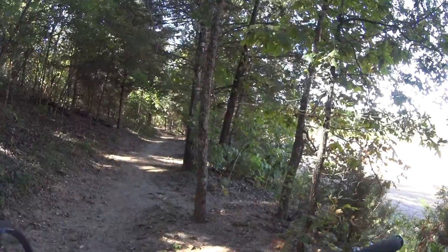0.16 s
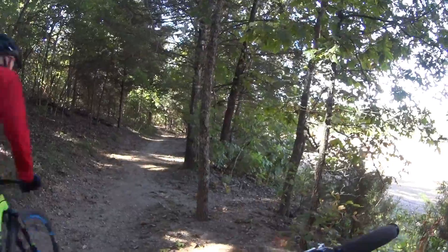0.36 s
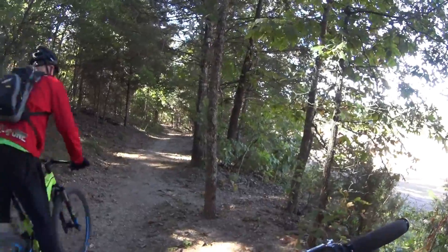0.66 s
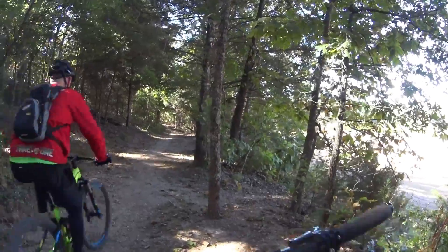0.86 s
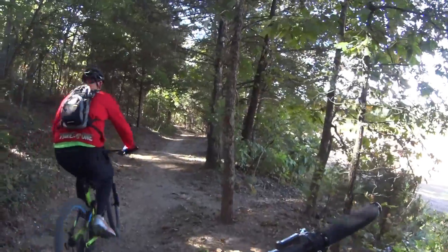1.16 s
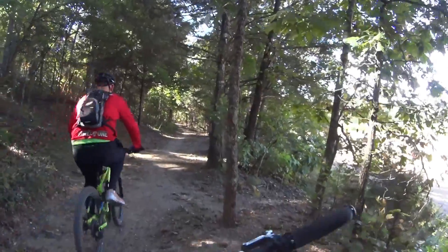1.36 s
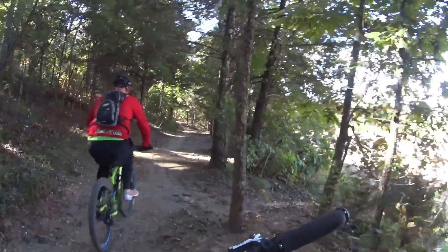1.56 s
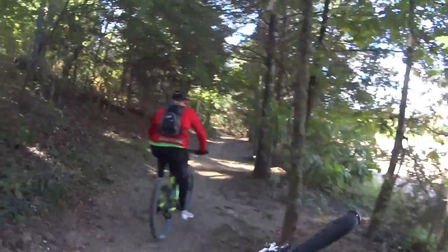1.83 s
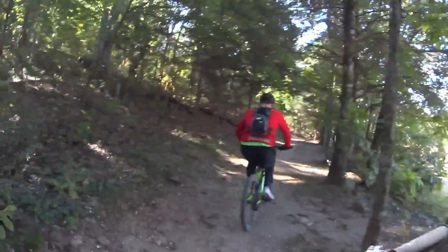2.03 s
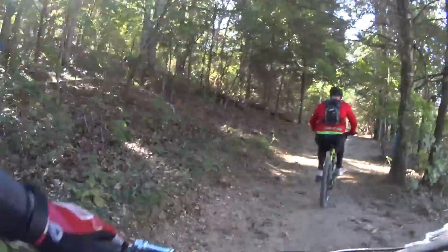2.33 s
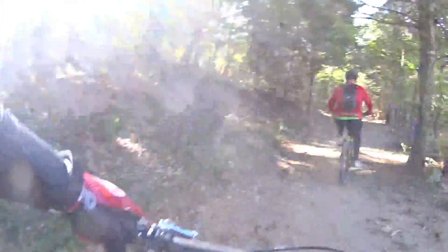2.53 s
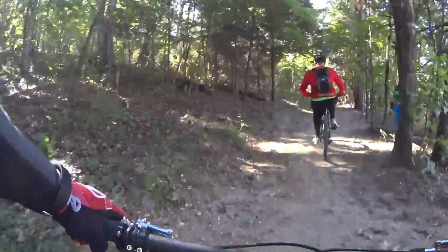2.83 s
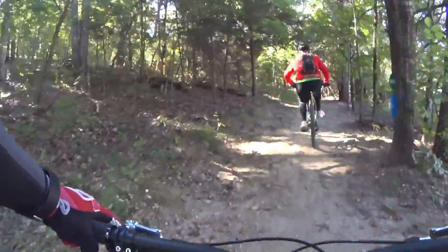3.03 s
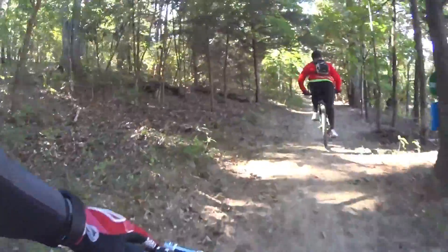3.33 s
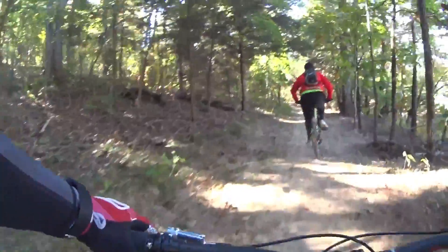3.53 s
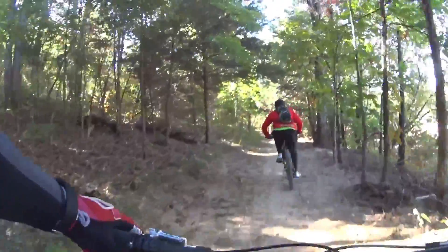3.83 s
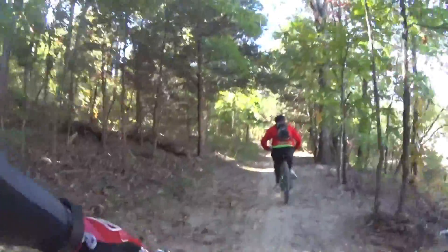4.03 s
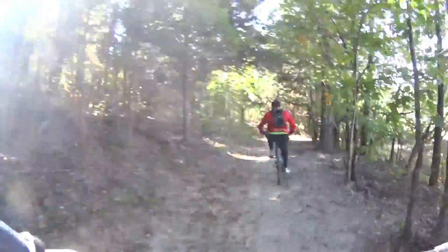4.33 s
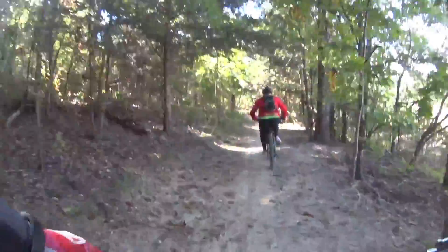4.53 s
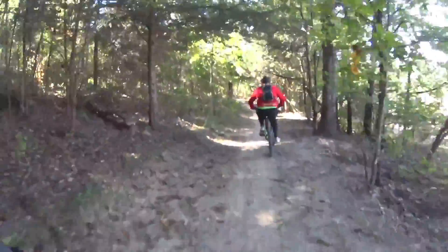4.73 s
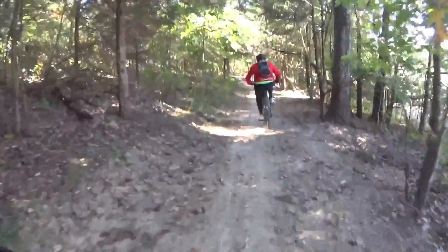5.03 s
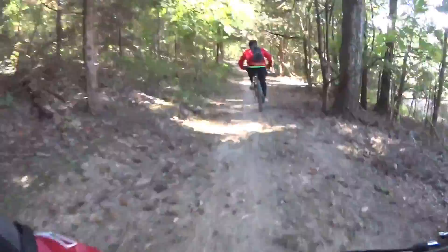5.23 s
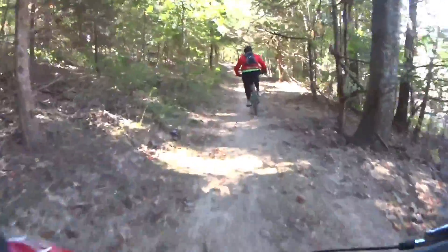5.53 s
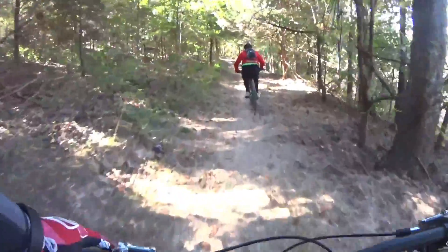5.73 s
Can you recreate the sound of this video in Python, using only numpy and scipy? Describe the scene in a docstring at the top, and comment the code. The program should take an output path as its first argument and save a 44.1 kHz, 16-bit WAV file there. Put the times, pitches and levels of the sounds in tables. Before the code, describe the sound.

Heard close from the rider's chest in open air, a bicycle starts rolling with quick, bright metallic freewheel ticks. These give way to tyres crunching in waves through dirt and dry leaves on a forest path, getting louder as the bike speeds up. Irregular clacks, light chain and cable rattles, soft thumps and a few tiny steel pings come from the shaking bike.

```python
"""Mountain bike on a dry woodland trail

A bike sets off behind another, heard from the rider's chest. The freewheel ticks and whirrs at first;
then the tyres scrub in surges over grit and dead leaves, hissing more as the speed grows.
Stones and loose parts knock on the bike, and bumps thud through the frame."""
import sys
import numpy as np
from scipy import signal
from scipy.fft import rfft, irfft
from scipy.io import wavfile
from scipy.ndimage import uniform_filter1d, minimum_filter1d

SR = 44100
rng = np.random.default_rng(int(sys.argv[2]) if len(sys.argv) > 2 else 0)


def wav_record(signal):
    """Record a signal, one row per channel, as 16-bit PCM in the file named by sys.argv[1]."""
    frames = np.transpose(np.atleast_2d(signal))
    bounded = np.clip(frames, -1, 1)
    # unit amplitude maps onto the largest positive 16-bit level
    quanta = np.round(bounded * 32767).astype(np.int16)
    wavfile.write(sys.argv[1], SR, quanta)


N = 259114
TIME = np.arange(N) / SR


def from_db(db):
    """Decibels to gain."""
    return 10 ** (np.asarray(db) / 20)


def rms_one(x):
    """Scale to unit rms."""
    return x / np.sqrt(np.mean(x ** 2) + 1e-20)


def each_rms_one(blows):
    """Give every row the same energy."""
    return blows / np.std(blows, axis=1, keepdims=True)


def coloured(x, spectrum, size=4096):
    """Minimum-phase EQ on each row, so nothing rings ahead of an attack."""
    hz, db = np.transpose(spectrum)
    grid_hz = np.maximum(np.fft.rfftfreq(size, 1 / SR), 1)
    gain = from_db(np.interp(np.log(grid_hz), np.log(hz), db))
    cepstrum = irfft(np.log(gain))
    causal_fold = 1 + np.sign(size // 2 - np.arange(size)) - (np.arange(size) == 0)
    response = irfft(np.exp(rfft(cepstrum * causal_fold)))
    return signal.fftconvolve(x, response[None], axes=-1)[:, :x.shape[-1]]


def resonate(x, modes):
    """Parallel resonators of alternating polarity."""
    out = 0
    for k, (hz, width_hz, db) in enumerate(modes):
        r = np.exp(-np.pi * width_hz / SR)
        poles = [1, -2 * r * np.cos(2 * np.pi * hz / SR), r * r]
        out = out + (-1) ** k * from_db(db) * (1 - r * r) / 2 * signal.lfilter([1, 0, -1], poles, x)
    return out


def band_pass(blows, centre_hz, width_octaves):
    """Focus each row around its own pitch."""
    return np.array([signal.lfilter(*signal.iirpeak(hz, 1.4 / width_octaves, fs=SR), blow)
                     for blow, hz in zip(blows, centre_hz)])


def stereo(pair, side_db, pan_db):
    """Mid and side to left and right; positive pan leans left."""
    sides = np.array([[1], [-1]])
    return (pair[0] + from_db(side_db) * sides * pair[1]) * from_db(sides * pan_db / 2)


def crushes(per_s, t60, spread_db):
    """Power envelope of mean 1: things give way one by one, each starting at once and dying away."""
    sizes = from_db(spread_db * np.clip(rng.standard_normal(N), -2, 2)) ** 2
    onsets = sizes * (rng.random(N) < per_s / SR)
    decay = from_db(-120 / (t60 * SR))
    power = signal.lfilter([1], [1, -decay], onsets + 1e-18)
    return power / power.mean()


def fractures(per_s, spread_db, bed_db, power):
    """Two trains of tiny uneven breaks over a noise bed of finer ones, following a power envelope."""
    sizes = from_db(spread_db * np.minimum(rng.exponential(1, (2, N)), 2.3))
    polarity = rng.choice([-1, 1], (2, N))
    breaks = rms_one(sizes * polarity * (rng.random((2, N)) < per_s / SR))
    return np.sqrt(power) * (breaks + from_db(bed_db) * rng.standard_normal((2, N)))


def taps(per_s):
    """Light contacts at random moments, of uneven strength."""
    return (rng.random(N) < per_s / SR) * rng.uniform(0.58, 1, N) * rng.choice([-1, 1], N)


def contacts(count, t60, tail_db, tail_t60, size=2048):
    """One row per blow: a dying burst of micro-contacts with a faint longer tail."""
    age = np.arange(size) / SR
    envelope = from_db(-60 * age / t60) + from_db(tail_db - 60 * age / tail_t60)
    return rng.standard_normal((count, size)) * envelope


def placed(blows, start_s, peak_db):
    """Lay each row on the timeline at its moment and peak level."""
    out = np.zeros(N + blows.shape[1])
    for blow, s, db in zip(blows, start_s, peak_db):
        at = int(np.clip(s * SR, 0, N))
        out[at:at + len(blow)] += from_db(db) * blow / np.abs(blow).max()
    return out[:N]


def riding():
    """Three control curves in dB: speed, the tyres' surging bite, and high hiss."""
    # rolling speed, as loudness: time_s, level_db
    speed = [(0, -10.5), (.55, -10.5), (1.15, -5), (1.4, -7), (2.2, -3.5), (2.3, -4), (2.45, -4),
             (2.9, -3.5), (3.02, -2), (3.25, -1), (3.8, 0), (4.12, -2), (4.7, 1.5), (5.5, 1), (5.88, 3)]
    # high hiss level, the hub's whirr at first, then dry leaves: time_s, level_db
    high_hiss = [(0, 0), (.3, 6.5), (.95, 3.5), (1.15, 1), (1.6, 3.5), (2.3, 0.5), (2.55, 0), (3.0, 0),
                 (3.3, 3.5), (3.5, -1), (4.05, 3.5), (4.5, 2), (5.0, 6.5), (5.88, 6.5)]
    # the tyres bite into the dirt: peak_s, gain_db, swell_s, release_s
    surges = [(.19, 6.5, 0.056, 0.062), (.43, 4.5, 0.024, 0.022), (.73, 5.5, 0.063, .07),
              (.84, 7.5, .08, 0.052), (1.13, 2, 0.059, 0.11), (1.3, 8.5, .08, .07),
              (1.41, 10.5, 0.12, 0.12), (1.54, 9, 0.1, 0.072), (1.65, 8.5, 0.036, 0.033),
              (1.78, 10.5, 0.053, 0.18), (1.86, 4.5, 0.067, 0.065), (2.02, 9.5, .09, 0.16),
              (2.17, 9.5, 0.045, 0.082), (2.42, 3.5, .08, 0.09), (2.52, 6, 0.07, 0.066),
              (2.64, 5.5, 0.086, 0.11), (2.87, 7.5, 0.073, 0.052), (2.95, 7.5, 0.024, .03),
              (3.26, 8, 0.15, 0.08), (3.45, 3.5, 0.021, 0.049), (3.6, 7, 0.063, 0.1),
              (3.97, 3, 0.085, 0.15), (4.26, 4.5, 0.037, 0.031), (4.4, 4.5, .05, 0.1),
              (4.56, 7.5, 0.031, 0.035), (4.68, 5, .07, 0.045), (5.2, 2, 0.045, 0.19),
              (5.72, 2, 0.11, 0.025)]
    surge_db = np.zeros(N)
    for peak_s, gain_db, swell_s, release_s in surges:
        from_peak = np.maximum((peak_s - TIME) / swell_s, (TIME - peak_s) / release_s)
        surge_db = np.maximum(surge_db, gain_db * (1 - from_peak ** 2))  # a rounded arch
    speed_db = np.interp(TIME, *np.transpose(speed))
    hiss_db = np.interp(TIME, *np.transpose(high_hiss))
    return np.array([speed_db, surge_db, hiss_db])


def level_of(law, ride):
    """A rolling layer's level in dB: a base plus its own share of each control curve."""
    return law[0] + np.dot(law[1:], ride)


def tyres(ride):
    """Tread scrubs and grit crunches under a crackling hiss: the hub's whirr at first, then dry leaves."""
    # how each layer follows the ride: base_db, speed_share, surge_share, hiss_share
    scrub_law = (-39, 0.91, 1.25, -0.16)
    grit_law = (-40.5, 1.46, 0.86, -0.03)
    hiss_law = (-37.5, 1.29, 0.4633, 0.8751)
    spray_law = (-50.5, 1.0, 0.4, 2.0647)
    # resonances of tread and grit: pitch_hz, width_hz, gain_db
    tread_modes = [(1840, 320, -7), (2299, 153, -1), (2550, 200, -2.5)]
    grit_modes = [(778, 33, -7.5), (1083, 150, -4.5), (1320, 136, 1), (1734, 305, -2.5),
                  (2700, 1850, -15.5)]
    # tone of tread, grit, hiss and the fine spray above it: frequency_hz, gain_db
    tread_eq = [(500, -7), (1400, -3), (2500, 3), (3000, -1), (4000, -28), (9000, -23)]
    grit_eq = [(200, -18), (700, 2), (1000, 8.5), (2000, 0), (3200, 9.5), (7000, -13.5)]
    hiss_eq = [(900, -20.5), (2000, -12), (2800, 5.5), (3300, 3.5), (4000, 2), (4800, 3), (5400, 1.5),
               (5800, 4.5), (6400, -4), (7200, -15), (11000, -35.5)]
    spray_eq = [(4000, -9), (6400, 8), (7400, 3), (8100, 8.5), (8700, 5.5), (9100, 4.5), (9700, 4),
                (11000, -3)]
    pebbles = crushes(per_s=120, t60=0.056, spread_db=-1)
    crumples = crushes(per_s=130, t60=0.055, spread_db=4.5)
    slips = fractures(per_s=2500, spread_db=2, bed_db=-4, power=1 + from_db(-4.5) * pebbles)
    stones = fractures(per_s=900, spread_db=1.5, bed_db=4, power=1 + from_db(-1.5) * pebbles)
    # the louder the crackle, the more it merges into an even hiss
    hiss_db = level_of(hiss_law, ride)
    clumps = from_db(-0.6 * (hiss_db - hiss_db.mean())) * crumples
    snaps = fractures(per_s=1600, spread_db=10.5, bed_db=2.5, power=1 + clumps)
    fine_snaps = fractures(per_s=1400, spread_db=9.5, bed_db=1, power=1 + from_db(-10) * clumps)
    scrub = from_db(level_of(scrub_law, ride)) * rms_one(coloured(resonate(slips, tread_modes), tread_eq))
    grit = from_db(level_of(grit_law, ride)) * rms_one(coloured(resonate(stones, grit_modes), grit_eq))
    hiss = from_db(hiss_db) * rms_one(coloured(snaps, hiss_eq))
    spray = from_db(level_of(spray_law, ride)) * rms_one(coloured(fine_snaps, spray_eq))
    return (stereo(scrub, side_db=-9.5, pan_db=-6.5) + stereo(grit, side_db=-14.5, pan_db=-0.5)
            + stereo(hiss, side_db=-9, pan_db=-3) + stereo(spray, side_db=-5, pan_db=-0.5))


def frame_rumble(ride):
    """Rough ground shakes the bike, which hums in its low resonances over the dull roll of the earth."""
    # how each layer follows the ride: base_db, speed_share, surge_share, hiss_share
    rumble_law = (-53.5, 1.07, 0.47, -0.67)
    hum_law = (-53.5, 2, -0.07, 0.4)
    earth_law = (-49, 1.0, 0.6541, -0.13)
    # tone of the deep shake and of the earth under the wheels: frequency_hz, gain_db
    rumble_eq = [(20, -0.5), (35, -3), (60, -2), (100, 0.5), (155, -3), (220, 2), (330, -9), (600, -35.5)]
    earth_eq = [(200, -17), (330, -7), (420, -1), (490, -3.5), (541, 1), (600, -2.5), (720, -3),
                (1000, -1.5), (2000, -35.5)]
    # the bike's low resonances: pitch_hz, width_hz, gain_db
    hum_modes = [(133, 46, -10.5), (274.6, 54, 5)]
    shaking = rng.standard_normal((3, 2, N))
    shaking *= np.sqrt(1 + from_db(2.5) * crushes(per_s=36, t60=0.23, spread_db=0))
    rumble = from_db(level_of(rumble_law, ride)) * rms_one(coloured(shaking[0], rumble_eq))
    hum = from_db(level_of(hum_law, ride)) * rms_one(resonate(shaking[1], hum_modes))
    earth = from_db(level_of(earth_law, ride)) * rms_one(coloured(shaking[2], earth_eq))
    return (stereo(rumble, side_db=-12, pan_db=-1) + stereo(hum, side_db=-23, pan_db=1.5)
            + stereo(earth, side_db=-5, pan_db=-0.5))


def rattles(speed_db):
    """Cables and chain tap lightly at random, more often and harder as the speed grows."""
    # one ring per loose part: pitch_hz, width_hz, gain_db
    part_modes = [(1210, 56, 0.5), (1310, 68, 3), (1385, 86, 4), (1755, 66, 2.5)]
    shaking = from_db(1.3 * (speed_db - speed_db.max()))
    touches = shaking * taps(per_s=45 * shaking)
    part = rng.integers(0, len(part_modes), N)
    rings = sum(resonate(touches * (part == k), [mode]) for k, mode in enumerate(part_modes))
    return from_db(-44) * rms_one(rings)


def stone_flicks(speed_db, surge_db):
    """The tread flicks small stones against the bike, most of all while it bites."""
    # rings that each stone excites in a different mix: pitch_hz, width_hz, gain_db
    flick_modes = [(1260, 130, 4.5), (2300, 130, 14.5), (2680, 220, 15.5), (4240, 230, -3),
                   (5800, 600, -18.5)]
    force = from_db(0.62 * speed_db + 0.4 * surge_db)
    hits = force * taps(per_s=16 * force)
    pair = [rms_one(sum(resonate(hits * rng.uniform(0, 1, N), [mode]) for mode in flick_modes))
            for _ in range(2)]
    return from_db(-48) * stereo(pair, side_db=-6, pan_db=-1)


def freewheel():
    """Pawls drop into the ratchet: short, bright, metallic ticks."""
    # pawl ticks: start_s, level_db
    ticks = [(0.181, -23.5), (0.207, -32), (0.2452, -21.5), (0.2837, -19.5), (0.325, -23), (0.377, -23),
             (0.4163, -20), (0.4509, -24.5), (0.488, -21.5), (0.5382, -24), (0.5818, -25), (0.6162, -24),
             (0.6475, -20.5), (0.7035, -23.5), (0.7492, -23), (0.788, -24.5), (0.839, -18), (0.9344, -21.5),
             (0.9854, -23)]
    # tone of a tick: frequency_hz, gain_db
    pawl_eq = [(500, -19), (1600, -19), (2500, 2.5), (3600, -3.5), (4600, -5), (5900, 1), (7400, -7),
               (8300, -9), (8750, -6), (9100, -10.5), (11000, -13.5)]
    start_s, level_db = np.transpose(ticks)
    snaps = [contacts(len(ticks), t60=0.05, tail_db=-16, tail_t60=0.12, size=4096) for _ in range(2)]
    pair = [placed(coloured(snap, pawl_eq), start_s, level_db) for snap in snaps]
    return stereo(pair, side_db=-5, pan_db=4)


def bumps():
    """Roots and ruts give dull thuds: one jolt, then a dying shudder."""
    # bumps under the wheels: start_s, level_db, t60_s, pitch_hz
    hits = [(.182, -39, .04, 500), (0.605, -41, 0.047, 400), (0.647, -38.5, 0.029, 452),
            (0.739, -30.5, 0.025, 205), (1.292, -28.5, 0.12, 910), (1.386, -41, 0.13, 129),
            (1.874, -30, 0.028, 156), (2.183, -27.5, 0.048, 181), (2.343, -32.5, 0.074, 503),
            (2.946, -25, 0.03, 574), (3.129, -27.5, 0.093, 131), (3.78, -37, 0.05, 143),
            (4.413, -31.5, 0.15, 238), (4.43, -28, 0.16, 260), (4.479, -29, 0.056, 164),
            (4.627, -22, 0.035, 175), (4.643, -26.5, 0.1, 182), (4.644, -23, 0.042, 630),
            (4.772, -37, 0.057, 151), (5.39, -26.5, 0.042, 523)]
    # tone of a thud: frequency_hz, gain_db
    thud_eq = [(25, -11), (70, 1.5), (150, -5.5), (300, -8), (600, -5.5), (1200, -9), (4000, -80)]
    start_s, level_db, t60_s, pitch_hz = np.transpose(hits)
    shudder = contacts(len(hits), t60=t60_s[:, None], tail_db=-34, tail_t60=0.17, size=8192)
    jolt = from_db(24) * signal.unit_impulse(shudder.shape[1])
    thuds = band_pass(coloured(jolt + shudder, thud_eq), pitch_hz, width_octaves=0.6)
    return placed(thuds, start_s, level_db - 1)


def knocks():
    """Stones and loose parts ring the bike; the harder the contact, the more it cracks and splinters."""
    # the big knocks: start_s, level_db, pitch_hz, hardness_db, rebound_gain
    hits = [(0.1827, -25, 1420, -26.5, 0.56), (0.234, -27, 2670, 0, 0), (.429, -19.5, 2400, -5.5, 0),
            (0.6924, -23, 1700, -6, 0), (0.8559, -12.5, 3270, 0, 0.6), (1.0484, -19, 3120, -1, 0.1),
            (1.3944, -21.5, 2350, -44, 0.6), (1.5452, -13, 2780, -4, 0.5), (1.6196, -7, 2560, 6, 0.32),
            (1.6559, -11, 2430, -32, 0), (1.687, -16.5, 5320, 18, 0), (1.85, -15, 4970, 9, 0.4),
            (1.8623, -18, 1400, -16, 0.2), (2.004, -20, 2390, -23, 0), (2.012, -11.5, 1720, -16, 0.3),
            (2.0575, -14.5, 2400, -15, 0.4), (2.198, -6, 2130, -26, 0.45), (2.3422, -15.5, 1310, -8, 0.5),
            (2.4166, -17.5, 2800, -1, 0.4), (2.4305, -18.5, 1680, -20, 0.25), (2.637, -21, 1310, -22, .6),
            (2.65, -10.5, 3020, -3, 0.1), (2.6833, -17, 2430, 7, .9), (2.7358, -11.5, 3530, 18.5, 0),
            (2.9116, -18, 5060, 21, 0), (2.9424, -14.5, 2160, -13.5, 0.46), (3.0903, -19.5, 2300, -30, 0.1),
            (3.1243, -11, 2780, 1, 0), (3.1303, -11, 1080, -16, 0.32), (3.2543, -13.5, 2480, -20, .6),
            (3.3162, -14, 3060, 15, 0.7), (3.4232, -16.5, 1970, -20, 0.2), (3.5412, -21, 2360, -34, 0.1),
            (3.5701, -16.5, 2800, -16, 0.1), (4.1711, -4.5, 2100, -26.5, 0), (4.247, -20, 3620, 12, 0.1),
            (4.3562, -17.5, 2930, 15, 0.4), (4.3951, -14.5, 2390, -16, 1), (4.44, -16, 1860, -13, 0),
            (4.548, -10.5, 2540, -10, 0.24), (4.6302, -17, 2080, -32, 0), (4.6411, -18, 1190, -27, 0),
            (4.6744, -17.5, 1310, 1, 0), (4.696, -16.5, 2160, -17, 0.5), (4.753, -19, 1310, -19, 0),
            (5.056, -13, 5210, 12, 0.2), (5.1781, -14, 2700, -11.5, 0.6), (5.2108, -15, 2500, -4, 0.1),
            (5.4053, -12, 1550, -11, 0), (5.7937, -11.5, 3380, 1, 0)]
    # resonances of the struck bike: pitch_hz, width_hz, gain_db
    bike_modes = [(544, 32, 6.5), (832, 65, 0), (984, 52, 2.5), (1274, 170, 3.5), (1848, 86, 0.5),
                  (2296, 150, 2), (2940, 1360, -15), (4300, 430, -12)]
    # tone of the crack and of its splintery top: frequency_hz, gain_db
    crack_eq = [(600, -13.5), (2000, 3), (2900, 16.5), (4000, 7.5), (5500, 8), (7000, -2), (11000, -18.5)]
    splinter_eq = [(2000, -8), (5000, 5), (7500, 5), (11000, -1.5)]
    start_s, level_db, pitch_hz, hardness_db, rebound_gain = np.transpose(hits)
    hardness = from_db(hardness_db[:, None])
    rebound_s = start_s + 0.007  # a knocked part bounces and strikes again
    rebound_db = level_db + 20 * np.log10(np.clip(rebound_gain, 1e-6, 1))
    pair = []
    for _ in range(2):
        push = contacts(len(hits), t60=0.011, tail_db=-28, tail_t60=0.04)
        snap = contacts(len(hits), t60=0.012, tail_db=-17, tail_t60=0.045)
        first_touch = 1.63 * signal.unit_impulse(push.shape[1])
        ring = band_pass(resonate(push + 2 * first_touch, bike_modes), pitch_hz, width_octaves=0.52)
        body = each_rms_one(band_pass(ring, pitch_hz, width_octaves=3.7))
        crack = each_rms_one(coloured(snap + first_touch, crack_eq))
        splinter = each_rms_one(coloured(snap + first_touch, splinter_eq))
        blows = body + from_db(10) * hardness * (crack + from_db(-16) * hardness * splinter)
        pair.append(placed(blows, start_s, level_db + 1.5) + placed(blows, rebound_s, rebound_db))
    return stereo(pair, side_db=-16, pan_db=-3.3)


def pings():
    """Now and then a spoke or another small steel part rings briefly."""
    # steel rings: start_s, level_db, pitch_hz, t60_s
    rings = [(0.286, -25.5, 8780, 0.032), (1.279, -25.5, 5900, 0.03), (2.151, -29, 5600, .015),
             (4.246, -26, 3800, .04), (4.293, -26, 3720, .04), (4.312, -22.5, 3680, 0.024),
             (4.878, -18, 5720, 0.04)]
    start_s, level_db, pitch_hz, t60_s = np.transpose(rings)
    age = np.arange(4096) / SR
    tones = from_db(-60 * age / t60_s[:, None]) * np.sin(2 * np.pi * pitch_hz[:, None] * age)
    return placed(tones, start_s, level_db - 0.4)


def scene():
    """Rolling layers and impacts, all close and dry in open air."""
    ride = riding()
    speed_db, surge_db, _ = ride
    rolling = tyres(ride) + frame_rumble(ride) + rattles(speed_db) + stone_flicks(speed_db, surge_db)
    return rolling + freewheel() + knocks() + bumps() + pings()


def limited(x, threshold_db, release_db_per_s):
    """Peaks over the threshold duck the gain within a millisecond; it then climbs back steadily."""
    peak_db = 20 * np.log10(np.abs(x).max(axis=0) + 1e-9)
    excess_db = np.maximum(peak_db - threshold_db, 0)
    recovery_db = release_db_per_s * TIME
    held_db = np.maximum.accumulate(excess_db + recovery_db) - recovery_db
    gain_db = uniform_filter1d(minimum_filter1d(-held_db, size=45), size=45)
    return x * from_db(gain_db)


def record(dry):
    """A limiter holds the peaks and a steep low-pass cuts the top."""
    cutoff_hz = 11030
    held = limited(dry, threshold_db=-2.5, release_db_per_s=70)
    return signal.sosfilt(signal.ellip(12, 0.1, 70, cutoff_hz, fs=SR, output="sos"), held)


dry = scene()
out = record(dry)
wav_record(out)
```